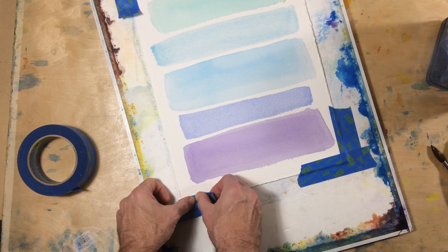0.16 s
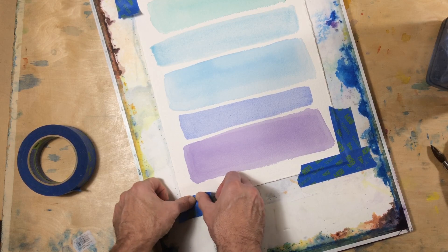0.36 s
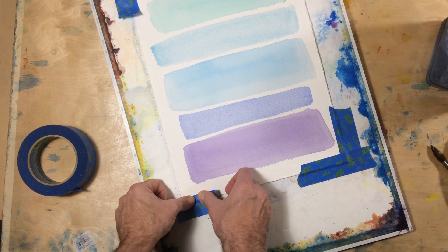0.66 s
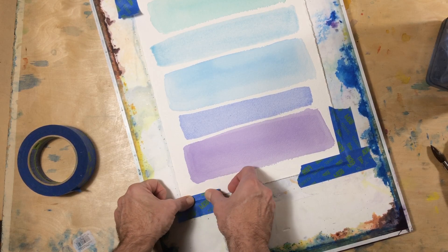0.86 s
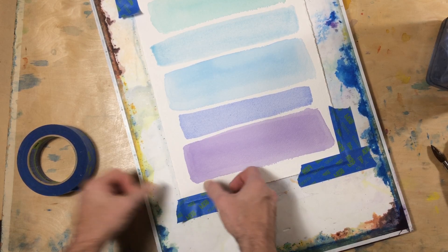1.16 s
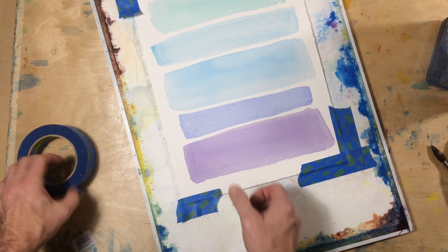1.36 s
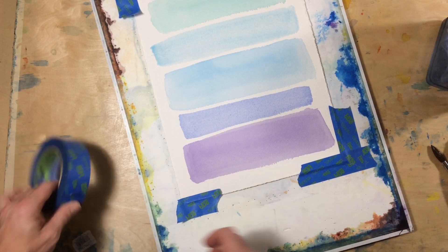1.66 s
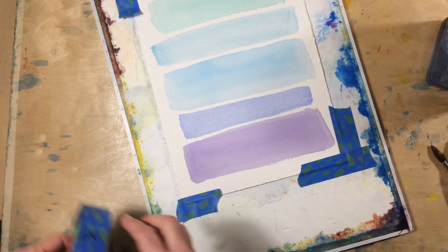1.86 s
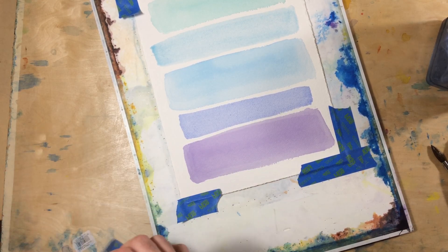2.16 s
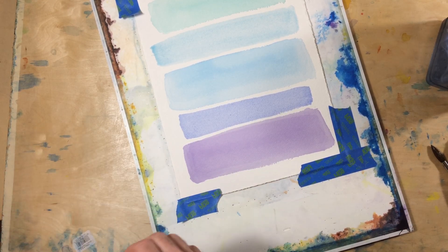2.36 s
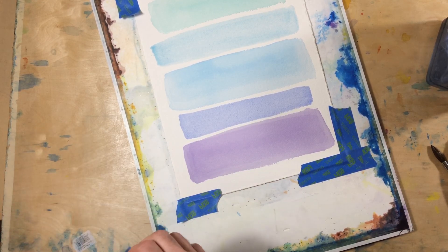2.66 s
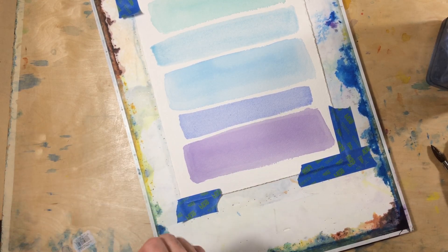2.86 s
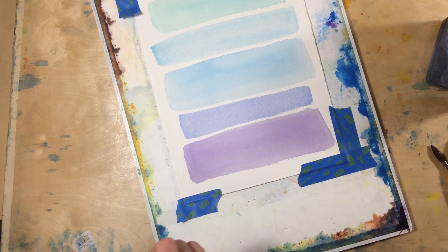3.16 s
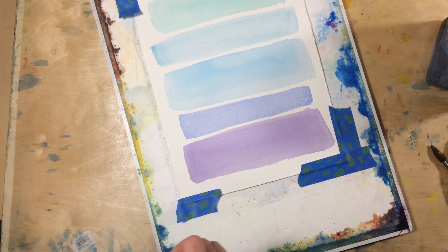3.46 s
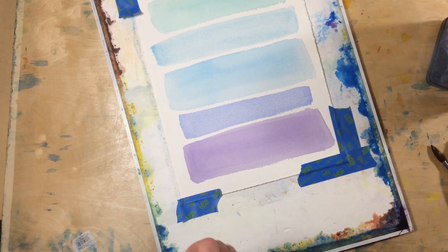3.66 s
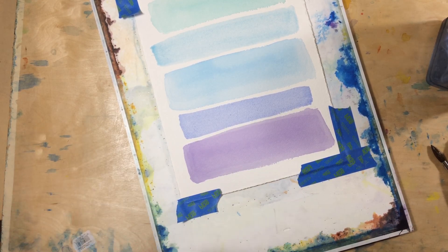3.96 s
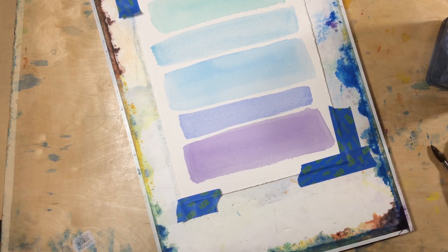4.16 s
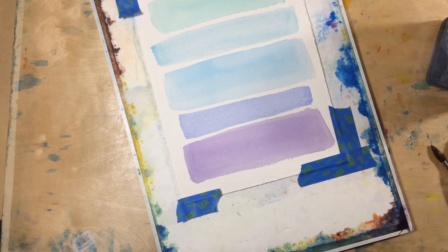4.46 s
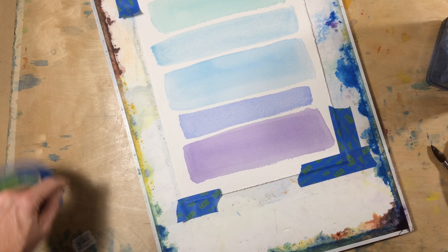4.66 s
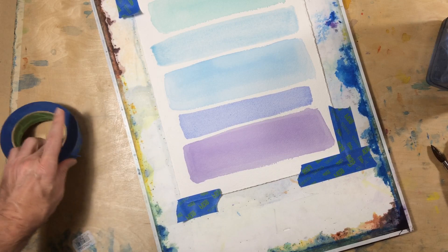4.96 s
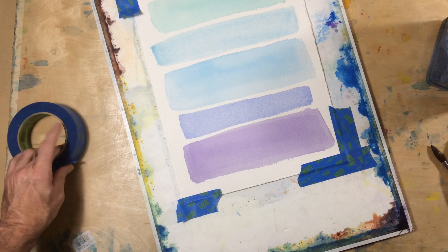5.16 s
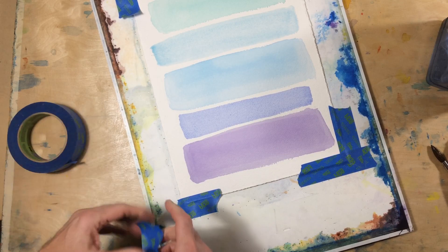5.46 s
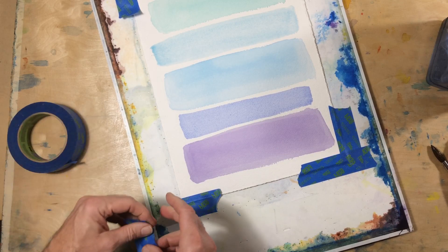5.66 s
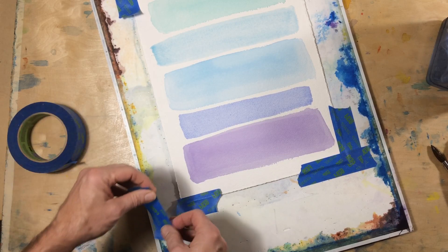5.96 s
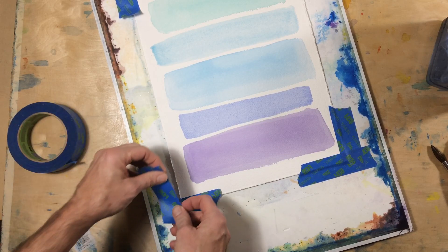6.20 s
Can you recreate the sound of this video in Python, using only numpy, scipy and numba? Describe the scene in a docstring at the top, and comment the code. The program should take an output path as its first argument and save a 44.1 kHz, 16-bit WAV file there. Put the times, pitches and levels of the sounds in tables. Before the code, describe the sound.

Masking tape crinkles softly, rasps off its roll and is ripped across, then the roll knocks down on a wooden table.

```python
"""A few soft crinkles and rubs, then masking tape rasps off its roll, rips, and the roll knocks twice.
Fingers press a strip onto paper and pick up the roll from a wooden table in a small, quiet room.
As a new length peels off, snapping glue threads shake it, and its ring sinks as it grows longer.
Its paper fibres break as it is torn across; setting the roll down rings roll, table and room.
The loose strip crinkles as it is laid on the paper."""
import sys
import numpy as np
from scipy import signal
from scipy.io import wavfile
from scipy.ndimage import uniform_filter1d
from numba import njit

SR = 44100
rng = np.random.default_rng(int(sys.argv[2]) if len(sys.argv) > 2 else 0)


def persist_wave(psi):
    """Save psi, clipped to +-1, as 16-bit WAV."""
    counts = np.round(np.clip(psi, -1, 1) * 32767).astype(np.int16)
    wavfile.write(sys.argv[1], SR, np.atleast_2d(counts).T)


N = 279153
TIME = np.arange(N) / SR
# tone of rubbing fingers and rustling tape: (frequency [Hz], level [dB])
RUB_TONE = [(200, -10.5), (900, -3.5), (2000, -2.5), (3000, -1), (4200, 0), (5500, -0.5), (7000, -1),
            (11000, -3), (16000, -7.5)]


def peel(squeal_db=-6.0, crackle_db=-3.5, speed_boost_db=1.5, squeal_fade_db_per_s=50):
    """Glue threads snap and shake the tight strip, whose squeal sinks during each pull."""
    # pulls on the roll: (time [s], hold [s], relative crackle level [dB],
    # relative squeal level [dB], squeal pitch [Hz], pitch fall [octaves/s])
    pulls = [(3.075, 0.017, -42.5, -40, 2195, 8.2), (3.226, 0.13, -45.5, -47, 1630, 1.5),
             (3.385, 0.31, -44, -43.5, 2390, 2.97)]
    # tone of the snapping glue: (frequency [Hz], level [dB])
    glue_tone = [(200, -37), (450, -16), (900, -14), (1500, -15.5), (2400, -7), (3400, -7.5), (4300, 0.5),
                 (5200, 0), (6500, 1), (9000, -3.5), (12000, -4), (16000, -9)]
    # notes in the squeal: (multiple of its pitch, width [Hz], level [dB])
    squeal_notes = [(.68, 190, -2.5), (1.0, 220, 5), (1.3, 400, -1.5), (1.85, 300, -1)]
    attack_s, release_s = 0.053, 0.057
    threads = grains(per_s=7000, spread_db=2.5, clump_db=1.0)
    # the glue holds and lets go in patches, so the squeal stutters
    slips = grains(per_s=4400, spread_db=1.5, clump_db=2.0)
    crackle_gain, squeals, pulling = 0, 0, 0
    for start, hold_s, db, ring_db, hz, fall in pulls:
        pull = stroke(start, hold_s, attack_s, release_s)
        age = np.clip(TIME - start, -attack_s, hold_s + release_s)
        pitch = hz * 2 ** (-fall * age)
        squeal = sum(from_db(note_db) * resonance(slips, multiple * pitch, width)
                     for multiple, width, note_db in squeal_notes)
        squeals += from_db(ring_db - squeal_fade_db_per_s * np.maximum(age, 0)) * pull * steady(squeal)
        crackle_gain = np.maximum(crackle_gain, from_db(db) * pull)
        pulling = np.maximum(pulling, pull)
    # in the long pull the hand speeds up, then slows down
    sweep_start, sweep_s = 3.34, 0.33
    angle = np.pi * np.clip((TIME - sweep_start) / sweep_s, 0, 1)
    progress, speed = (1 - np.cos(angle)) / 2, np.sin(angle)
    crackle_gain *= from_db(crackle_db + speed_boost_db * speed)
    rasp = crackle_gain * steady(colour(threads, glue_tone))
    strip = groan(threads, progress, fastest_at=sweep_start + sweep_s / 2)
    return rasp + from_db(squeal_db) * squeals + pulling * strip


def groan(threads, progress, fastest_at, first_hz=640, length_ratio=1.54, peak_db=-51, swell_s=.3):
    """The free strip rings lower and purer as it lengthens, loudest when the hand is fastest."""
    hz = first_hz / (1 + (length_ratio - 1) * progress)
    width_hz = 140 * (55 / 140) ** progress
    swell_db = -20 * np.minimum(((TIME - fastest_at) / swell_s) ** 2, 10)
    ring = resonance(threads, hz, width_hz)
    return from_db(peak_db + swell_db) * steady(resonance(ring, hz, width=hz))


def tear(start=4.594, creep_s=0.027, run_s=0.0033, attack_s=.014, release_s=0.022):
    """Paper fibres break: the tear creeps in from the edge, runs across and sets the strip ringing."""
    # tone of the breaking fibres: (frequency [Hz], level [dB])
    fibre_tone = [(250, -30.5), (700, -22), (1200, -19), (2000, -10), (2600, -9), (3600, -6.5),
                  (6700, -4.5), (9000, -4.5), (12000, -9.5), (16000, -10.5)]
    # notes of the tight strip: (frequency [Hz], width [Hz], level [dB])
    strip_notes = [(3730, 180, 1.5), (4160, 140, 3), (4660, 67, 5.5), (6710, 150, 1.5), (8290, 28, 7),
                   (10960, 190, 7)]
    fibres = colour(grains(per_s=16000, spread_db=2.0, clump_db=1.5), fibre_tone)
    creep = from_db(-42) * stroke(start, creep_s, attack_s, release_s)
    run = from_db(-22) * stroke(start + creep_s, run_s, attack_s, release_s)
    burst = np.maximum(creep, run) * (TIME > start) * steady(fibres, span_s=0.0071)
    return burst + sum(from_db(db) * resonance(burst, hz, width) for hz, width, db in strip_notes)


def knocks(clack_db=-1, clack_fade_s=0.044, thud_hz=330, grip_db_per_cycle=0.5):
    """Each blow clacks and rings the roll, table and room; the gripping hand shortens the ring."""
    # blows on the table: (time [s], level [dB], treble limit [Hz], low thud boost [dB])
    blows = [(1.111, -54, 1800, 2), (1.164, -57.5, 1090, -3), (1.493, -63, 176, 14),
             (1.5491, -39, 2200, 8.5), (1.56, -39.5, 1030, 2), (1.568, -38, 372, -3.5),
             (5.089, -28.5, 802, 3.5), (5.2389, -15.5, 2420, -4), (5.2485, -25, 2000, -4.5)]
    # ringing notes of the roll, the table and the room:
    # (frequency [Hz], level [dB], time to fade 60 dB without the hand [s])
    ringing_notes = [(66, -25, .1), (95, -26, .1), (150, -27, .07), (210, -8.5, .11), (285, -13, .07),
                     (358, -17, .17), (550, -15, .06), (632, 3.5, .055), (735, -8, .07), (812, -5, .07),
                     (933, -7, .06), (1106, -8, .06), (1250, -9, .06), (1354, -4.5, .06), (1425, -13, .06),
                     (1587, -9, .05), (1990, -7.5, .05), (2225, -15, .05), (2610, -18, .04),
                     (3090, -16, .04), (3450, -18, .04), (3800, -18, .035)]
    # tone of the clack: (frequency [Hz], level [dB])
    clack_tone = [(80, -28), (150, -22.5), (300, -13.5), (450, -11.5), (700, -4), (1400, -6), (2300, -6.5),
                  (3800, -6), (5000, -22.5), (12000, -32.5)]
    out, t = np.zeros(N), TIME[:SR // 2]
    for start, db, treble_hz, thud_db in blows:
        ring = 0
        for hz, note_db, fade_s in ringing_notes:
            first_db = note_db + thud_db / (1 + (hz / thud_hz) ** 4)
            fade_db = (60 / fade_s + grip_db_per_cycle * hz) * t
            ring += rng.choice([-1, 1]) * from_db(first_db - fade_db) * np.sin(2 * np.pi * hz * t)
        clack = noise(len(t), clack_tone) * from_db(clack_db - 60 * t / clack_fade_s)
        blow = band_pass(ring + clack, 50, treble_hz, order=3)  # a softer contact has less treble
        add(out, start, from_db(db) * blow / np.std(blow[t < .016]))
    return out


def crinkles(rustle_db=-19, rustle_s=0.015, ring_sharpness=3.6):
    """A crease flips or glue lets go: the snap rings a bit of tape, which settles with a rustle."""
    # snaps of the tape: (time [s], level [dB], decay time [s], ring pitch [Hz], ring boost [dB])
    snaps = [(0.108, -48, 0.00026, 3950, 14), (0.156, -51, 0.0016, 3750, 27), (0.3482, -52, .003, 5670, 13),
             (0.3736, -40.5, 0.0047, 5900, 6), (0.463, -39, 0.00034, 3900, 8.5),
             (1.1125, -53, 0.0017, 11200, -15), (1.130, -53.5, 0.0013, 11600, 15),
             (1.32, -55, 0.0013, 9000, -4), (1.3307, -49, 0.0023, 4280, 4),
             (1.423, -54.5, 0.0077, 5050, 42), (1.551, -42, .0013, 4100, 30), (1.561, -45, .0015, 3800, 32),
             (2.481, -41, .0024, 6300, 16), (2.681, -60, 0.0019, 5000, 2), (2.927, -57.5, 0.004, 5000, -18),
             (3.035, -49, 0.0073, 6260, 22), (3.834, -45.5, 0.005, 8900, 4),
             (3.856, -37.5, 0.0025, 1810, -3), (4.0328, -61.5, 0.0016, 6000, -20),
             (4.5942, -31, .003, 14500, -8.5), (4.782, -55.5, .0022, 6400, 41),
             (4.840, -49, 0.005, 6200, 6), (4.962, -42, .003, 2880, 5), (5.6496, -36, 0.00086, 5830, 4),
             (5.658, -46.5, 0.0029, 2010, 21), (5.678, -51.5, .0005, 1990, 30),
             (5.9218, -37.5, 0.00062, 8900, 3), (6.153, -58, 0.00096, 4430, 33),
             (6.202, -61.5, 0.0039, 4200, 20)]
    # tone of a snap: (frequency [Hz], level [dB])
    snap_tone = [(150, -9), (600, 1.5), (1200, -6.5), (2200, -2.5), (5000, -1), (10000, 0), (16000, 1)]
    out, t = np.zeros(N), TIME[:SR // 12]
    for start, db, decay_s, ring_hz, ring_db in snaps:
        burst = colour(rng.choice([-1, 1], len(t)) * np.exp(-t / decay_s), snap_tone)
        snap = burst + from_db(ring_db) * resonance(burst, ring_hz, ring_hz / ring_sharpness)
        rustle = noise(len(t), RUB_TONE) * from_db(rustle_db) * np.exp(-t / rustle_s)
        add(out, start, from_db(db) * (snap / np.std(snap[t < .004]) + rustle))
    return out


def friction():
    """Skin and cardboard catch on tiny bumps as they slide."""
    # fingers sliding on tape and paper: (time [s], hold [s], level [dB])
    rubs = [(0.151, .04, -62), (0.217, .13, -75.5), (0.364, .03, -58), (0.48, .22, -75), (1.14, .03, -63),
            (1.262, .03, -67), (1.347, .04, -68.5), (2.16, .035, -74), (2.303, 0.069, -73),
            (2.425, .26, -73), (2.899, .12, -72), (3.831, .035, -60.5), (4.171, .09, -65.5),
            (4.29, .1, -70), (4.436, .02, -67), (4.81, .13, -60.5), (4.95, .015, -56), (5.09, .2, -70),
            (5.296, .01, -52.5), (5.548, .09, -74.5), (5.655, .02, -57), (5.879, .08, -58),
            (5.991, .23, -72.5)]
    # roll and hand dragging on the table: (time [s], hold [s], level [dB])
    drags = [(0.854, 0.074, -69), (1.51, 0.019, -60.5), (1.555, 0.038, -46), (1.619, 0.014, -42),
             (1.715, 0.034, -58.5), (5.11, .12, -64)]
    # tone of the dragging: (frequency [Hz], level [dB])
    drag_tone = [(150, -7), (700, 8.5), (1500, 11), (4000, 5), (6500, 1), (10000, -6), (16000, -17)]
    rub = rms_one(colour(grains(per_s=5800, spread_db=3.5, clump_db=1.5), RUB_TONE))
    drag = rms_one(colour(grains(per_s=5400, spread_db=2.5, clump_db=2.2), drag_tone))
    rub *= sum(from_db(db) * stroke(start, hold_s, 0.023, .025) for start, hold_s, db in rubs)
    drag *= sum(from_db(db) * stroke(start, hold_s, 0.01, 0.018) for start, hold_s, db in drags)
    return rub + drag


def room_echo(x, first_echo_s=0.0011):
    """The small room returns a blur of echoes that fades at its own rate in each octave."""
    # how long the echo lasts: (frequency [Hz], time to fade 60 dB [s])
    fade_times = [(150, .3), (630, .26), (2000, .31), (6000, .28), (15000, .21)]
    # strength of the echo against the sound sent in: (frequency [Hz], level [dB])
    echo_levels = [(90, -10), (200, -5), (400, -7.5), (630, -14.5), (900, -5), (2000, -9), (6000, -12.5),
                   (15000, -11.5)]
    t, response = TIME[:SR // 2], 0
    edges = np.geomspace(70, 18000, 9)
    for low, high in zip(edges, edges[1:]):
        hz = np.sqrt(low * high)
        fade = from_db(-60 * t / at_hz(fade_times, hz)) * (t > first_echo_s)
        band = band_pass(rng.standard_normal(len(t)) * fade, low, high, order=2)
        band *= np.sqrt(2 * (high - low) / SR / np.sum(band ** 2))  # gain near 1 in this octave
        response += from_db(at_hz(echo_levels, hz)) * band
    return signal.fftconvolve(x, response)[:N]


def background(air_db=-67, hum_hz=60.7, hum_db=-72):
    """The quiet room has a low rumble, a faint hiss and a faint deep hum."""
    # tone of the rumble and hiss: (frequency [Hz], level [dB])
    air_tone = [(12, -53.5), (20, -13), (65, -3), (193, -10), (255, -10), (367, -15), (446, -18.5),
                (527, -20), (780, -24), (849, -25.5), (1760, -30), (2320, -30.5), (3160, -33), (3950, -34),
                (16000, -38)]
    return from_db(air_db) * noise(N, air_tone) + from_db(hum_db) * np.sin(2 * np.pi * hum_hz * TIME)


def grains(per_s, spread_db, clump_db, clump_s=0.0058):
    """Tiny snaps of uneven size at random moments, louder and softer in clumps."""
    sizes = from_db(spread_db * np.minimum(rng.exponential(1, N), 4)) * rng.choice([-1, 1], N)
    clumps = rms_one(uniform_filter1d(rng.standard_normal(N), int(clump_s * SR)))
    return sizes * (rng.random(N) < per_s / SR) * from_db(clump_db * clumps)


def stroke(start, hold_s, attack_s, release_s):
    """Strength of one movement: full for hold_s, 20 dB lower attack_s before and release_s after."""
    before = np.maximum(start - TIME, 0) / attack_s
    after = np.maximum(TIME - start - hold_s, 0) / release_s
    return from_db(-20 * (before + after).clip(0, 10))


def resonance(x, hz, width):
    """Make x ring at a steady or moving pitch; a smaller width (Hz) gives a purer note."""
    return resonate(x, hz + np.zeros(len(x)), width + np.zeros(len(x)))


@njit
def resonate(x, hz, width):
    """Work out the ringing one sample at a time."""
    y = np.zeros(len(x))
    for i in range(2, len(x)):
        r = np.exp(-np.pi * width[i] / SR)  # share of the ring left after one sample
        push = (1 - r * r) / 2 * (x[i] - x[i - 2])
        y[i] = push + 2 * r * np.cos(2 * np.pi * hz[i] / SR) * y[i - 1] - r * r * y[i - 2]
    return y


def colour(x, tone):
    """Shape x with a tone table, adding no sound ahead of a snap (a minimum-phase filter)."""
    hz = np.abs(np.fft.fftfreq(8192, 1 / SR))
    response = np.exp(signal.hilbert(np.log(from_db(at_hz(tone, hz)))).conj())
    return signal.fftconvolve(x, np.fft.ifft(response).real[:len(hz) // 2])[:len(x)]


def noise(samples, tone):
    """Noise of strength 1 with the given tone."""
    return rms_one(colour(rng.standard_normal(samples), tone))


def band_pass(x, low_hz, high_hz, order):
    """Keep what lies between two frequencies."""
    return signal.sosfilt(signal.butter(order, [low_hz, high_hz], "band", fs=SR, output="sos"), x)


def at_hz(table, hz):
    """Read between the rows of a table, spacing octaves evenly."""
    frequencies, values = np.array(table).T
    return np.interp(np.log(hz + 1e-9), np.log(frequencies), values)


def steady(x, span_s=0.047):
    """Hold the strength near 1 while keeping the fast crackle."""
    return x / np.sqrt(uniform_filter1d(x ** 2, int(span_s * SR)).clip(1e-12))


def rms_one(x):
    """Scale to an average strength (rms) of 1."""
    return x / np.sqrt(np.mean(x ** 2) + 1e-20)


def from_db(db):
    """Turn decibels into a multiplier."""
    return 10 ** (np.asarray(db) / 20)


def add(out, start_s, sound):
    """Mix a sound in at the given time."""
    start = int(start_s * SR)
    out[start:start + len(sound)] += sound[:N - start]


def scene():
    """The handwork, each sound with its share of echo, over the quiet room."""
    # (sound, level sent to the echo [dB])
    sources = [(peel(), 3.0), (tear(), 1.5), (friction() + crinkles(), -1.0), (knocks(), 0.5)]
    direct = sum(sound for sound, _ in sources)
    echo = room_echo(sum(from_db(echo_db) * sound for sound, echo_db in sources))
    return (direct + echo + background())[None]


def record(dry, low_hz=25, high_hz=16200):
    """The microphone loses the deepest bass; the highest treble is cut steeply."""
    thin = signal.sosfilt(signal.butter(1, low_hz, "high", fs=SR, output="sos"), dry)
    return signal.fftconvolve(thin, signal.firwin(201, high_hz, fs=SR)[None], mode="same")


dry = scene()
out = record(dry)
persist_wave(out)
```